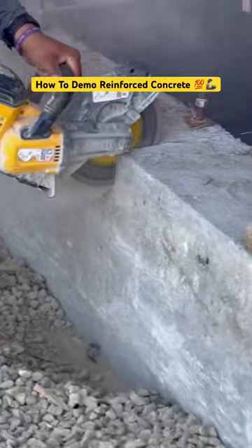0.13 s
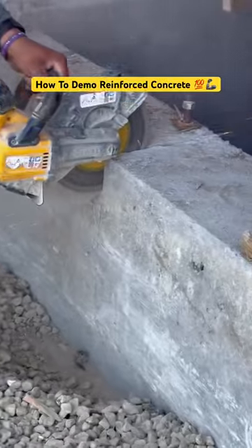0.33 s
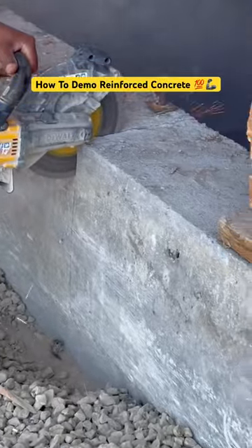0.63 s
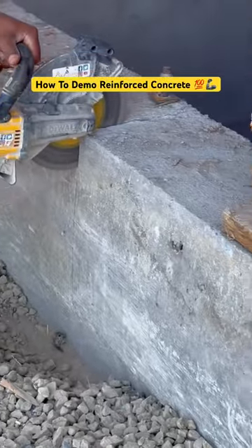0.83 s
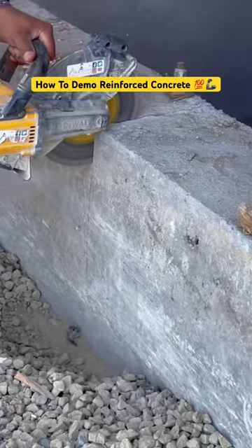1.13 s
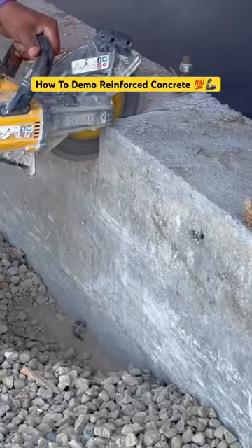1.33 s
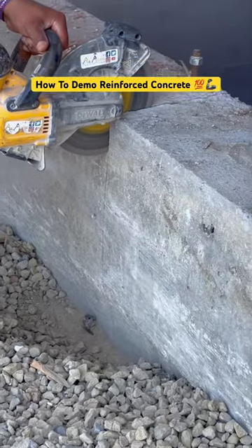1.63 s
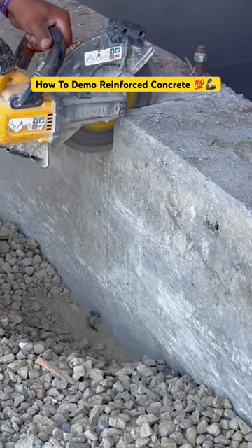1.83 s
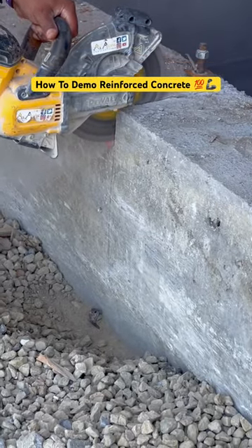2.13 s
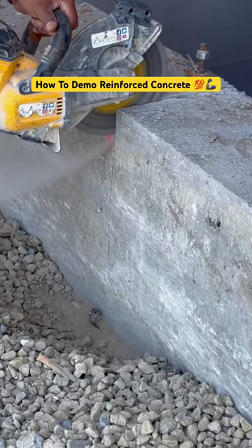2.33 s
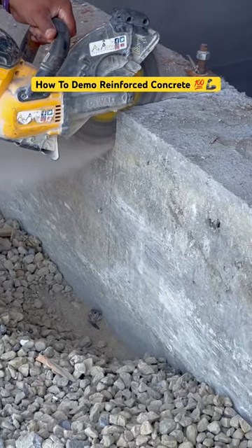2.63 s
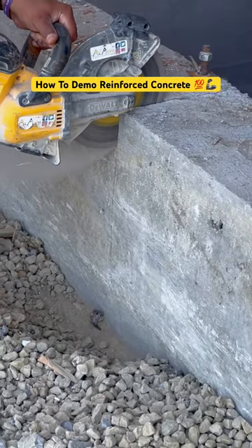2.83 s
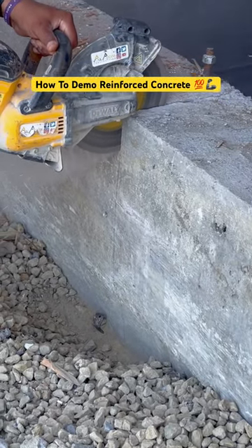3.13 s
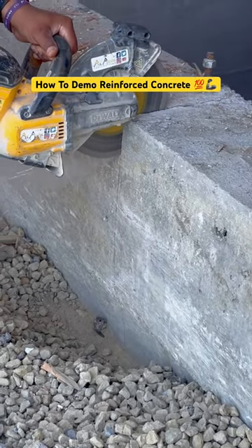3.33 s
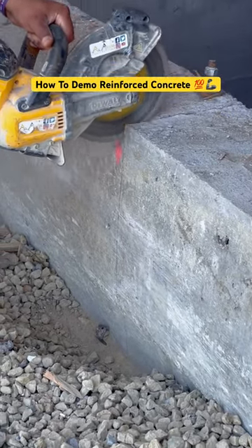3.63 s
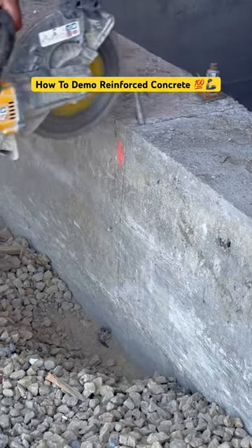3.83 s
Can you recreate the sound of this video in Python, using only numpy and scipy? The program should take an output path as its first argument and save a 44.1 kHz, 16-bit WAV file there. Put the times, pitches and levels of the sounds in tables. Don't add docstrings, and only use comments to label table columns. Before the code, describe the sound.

A handheld cut-off saw grinds loudly through concrete, then lifts out as its disc rings and motor winds down

```python
import sys
import numpy as np
from scipy import signal
from scipy.fft import rfft, irfft
from scipy.io import wavfile

SR = 44100
rng = np.random.default_rng(int(sys.argv[2]) if len(sys.argv) > 2 else 0)


def field_ratio(decibels):
    return 10 ** (np.asarray(decibels, dtype=float) / 20)


def unload_wav(signal):
    wavfile.write(
        sys.argv[1],
        SR,
        np.round(np.clip(np.atleast_2d(signal).T, -1, 1) * 32767).astype(np.int16),
    )


N = 176400
HZ = np.maximum(np.fft.rfftfreq(N, 1 / SR), 1)
TIME = np.arange(N) / SR


def in_time(rows):
    s, *columns = np.transpose(rows)
    return [np.interp(TIME, s, c) for c in columns]


def rms_one(x):
    return x / np.sqrt(np.mean(x ** 2) + 1e-20)


def gain_at(points, column=1):
    p = np.array(points)
    return field_ratio(np.interp(np.log(HZ), np.log(p[:, 0]), p[:, column]))


def shaped(x, gain):
    return irfft(rfft(x) * gain, N)


def colored_noise(gain):
    return rms_one(shaped(rng.standard_normal((2, N)), gain))


def drift(rate):
    r = np.exp(-128 * np.pi * rate / SR)
    noise = rng.standard_normal(N // 64 + 1502)
    slow = signal.lfilter([1], [1, -2 * r, r * r], noise)[1500:]
    return np.interp(np.arange(N) / 64, np.arange(len(slow)), rms_one(slow))


def resonate(x, hz, width_hz):
    r = np.exp(-np.pi * width_hz / SR)
    peak = (1 - r * r) / 2
    return signal.lfilter([peak, 0, -peak], [1, -2 * r * np.cos(2 * np.pi * hz / SR), r * r], x)


# (time [s], level [dB])
GUST = [(0.06, -51.5), (0.34, -56), (0.39, -67.5), (1.37, -82), (1.42, -78), (1.71, -65), (1.9, -71),
        (2.43, -70), (2.46, -56), (2.66, -60), (2.73, -74), (3.16, -71), (3.23, -63), (3.56, -78),
        (3.58, -66), (4.0, -61)]
# (frequency [Hz], density [dB per Hz])
WIND_TONE = [(25, -40), (55, -8), (85, -1), (120, -12), (190, -10), (280, -26), (420, -55), (900, -100)]


def wind():
    gust_db, = in_time(GUST)
    return field_ratio(gust_db - 3.0 + 1.3 * drift(4.2)) * colored_noise(gain_at(WIND_TONE))


# (time [s], level [dB])
SHUDDER = [(0.06, -55), (0.41, -56.5), (0.51, -66.5), (1.38, -68.5), (2.01, -58), (2.03, -65),
           (2.16, -55.5), (2.61, -55), (2.7, -59), (2.77, -57), (2.8, -66), (3.3, -76), (3.41, -62),
           (3.55, -82), (3.6, -59), (3.89, -69), (3.96, -62), (4.0, -67)]
# (frequency [Hz], density [dB per Hz])
SHUDDER_TONE = [(110, -28), (220, -6), (290, -2), (370, -5), (480, -2), (600, -8.5), (1200, -90)]


def shudder():
    shudder_db, = in_time(SHUDDER)
    return field_ratio(shudder_db + 1.0 * drift(8.6)) * colored_noise(gain_at(SHUDDER_TONE))


# (frequency [Hz], density [dB per Hz])
FAN_TONE = [(400, -26.5), (1400, -8), (1900, -5.5), (2800, -6.5), (6000, -13), (9000, -24), (11300, -14.5),
            (13600, -28)]


def fan():
    fan_db, top_hz = -45, 13900
    return field_ratio(fan_db + 0.93 * drift(29)) * colored_noise(gain_at(FAN_TONE) * (HZ < top_hz))


# (time [s], pitch [Hz], level [dB])
WHINE = [
    (3.66, 1160, -62),
    (3.70, 1165, -50),
    (3.79, 1170, -57),
    (3.83, 1130, -55),
    (3.88, 1055, -57),
    (3.925, 995, -44),
    (3.96, 975, -56),
    (4.0, 940, -56),
]


def motor():
    octave_db = -8
    hz, db = in_time(WHINE)
    phase = 2 * np.pi * np.cumsum(hz) / SR
    level = np.sqrt(2) * field_ratio(db + 4.3 * drift(20)) * (TIME > WHINE[0][0])
    mid = np.sin(phase) + field_ratio(octave_db) * np.sin(2 * phase)
    side = 0.66 * np.cos(phase)
    return level * np.array([mid, side])


# (frequency [Hz], level at the lift [dB], t60 [s])
FREE_RING = [(1940, -47.5, 1.5), (2210, -58, 3.0), (2720, -65, .9), (2719, -44.5, 0.65), (2830, -45.5, 1.1),
             (3020, -64, .6), (3500, -51, 1.5), (3960, -53, 1.5), (595, -62.5, 3.0), (954, -54, 0.21)]


def free_ring():
    freed_s, width_hz = 3.72, 10.4
    air = rng.standard_normal((2, N))
    since = TIME - freed_s
    swell = np.clip(1 + since / 0.14, 0, 1)
    out = 0
    for hz, db, t60 in FREE_RING:
        mode = rms_one(resonate(resonate(air, hz, width_hz), hz, 8 * width_hz))
        out = out + field_ratio(db - 60 * np.maximum(since, 0) / t60) * mode
    return swell * out


# (frequency [Hz], density [dB per Hz])
GRIT_TONE = [(330, -48), (480, -19), (620, -15), (1500, -13), (2500, -4.5), (5000, -4), (9000, -3.5),
             (15500, -6.5)]


def grit(turns):
    flutter_db, wobble = 0.39, 0.1
    flutter = field_ratio(flutter_db * (drift(17) + drift(16.0)))
    return colored_noise(gain_at(GRIT_TONE)) * flutter * (1 + wobble * np.cos(2 * np.pi * turns))


# (multiple of the speed, level [dB])
BUMPS = [(7, -4), (8, 4.5), (9, -1.5), (10, 3.5), (12, 1), (13, -3), (14, 0.5), (16, 4), (17, -6),
         (18, -11), (19, -4.5), (25, 3.5), (26, 2.5), (29, 9.5), (35, 4.5), (38, 0.5), (46, 5), (59, 3)]
# (time [s], length [s], multiple of the speed,
# level [dB])
SQUEALS = [(0.11, 0.12, 17, 20), (0.6, 0.29, 26, 6), (0.8, 0.41, 17, 18.5), (0.536, 0.3, 65, 13),
           (1.21, 0.36, 29, 3), (1.045, 0.093, 25, 7.5), (1.04, 0.039, 64, 18), (1.211, 0.13, 34, 15),
           (1.24, .38, 14, 13), (1.64, 0.35, 16, 7), (1.66, 1, 10, 5.5), (1.773, 0.36, 32, 25.5),
           (2.5, .08, 48, 22), (2.6, 0.2, 7, 13.5), (2.89, 0.15, 16, 10), (3.0, 0.14, 15, 10),
           (3.02, 0.066, 28, 21.5), (3.4, 0.084, 12, 14.5), (2.8, 0.16, 32, 14), (3.0, 0.12, 33, 11),
           (0.96, 0.16, 6, 19.5), (1.8, 1, 8, 5.5), (0.16, 0.18, 11, 9), (0.093, 0.16, 10, 0),
           (2.76, 0.38, 11, 8.5), (2.3, .5, 3, 18), (2.3, 0.34, 4, 32.5), (1.89, .15, 6, 22),
           (2.9, 0.23, 6, 16.5), (1.9, 0.13, 13, 24), (2.35, 0.18, 16, 18.5), (2.2, 0.16, 17, 23),
           (2.5, .7, 19, 12), (2.34, 0.44, 20, 9.5), (2.73, .4, 14, 6.5), (3, 0.21, 10, -1.5),
           (3.26, 0.55, 8, -15), (0.78, 0.3, 13, 11.5), (3.12, 0.21, 14, 9), (2.92, 0.16, 10, 3),
           (2.55, .2, 9, 2.5), (3.35, 0.16, 18, 18)]
# (frequency [Hz], gain [dB])
RIM_TONE = [(200, -36), (430, -23.5), (600, -7), (1300, -6), (2500, -3), (4000, 1.5), (5200, -1.5),
            (6000, -35)]


def squeal(multiple):
    db = 0
    for s, length_s, order, peak_db in SQUEALS:
        if round(order) == multiple:
            db = db + peak_db * np.exp(-(2 * (TIME - s) / length_s) ** 4)
    return field_ratio(db)


def rim(turns):
    wander_db = 1.8
    bumps = {round(k): db for k, db in BUMPS}
    step = np.exp(2j * np.pi * turns)
    spin = step ** 2
    out = np.zeros((2, N))
    for k in range(3, 72):
        spin = spin * step
        start = np.exp(2j * np.pi * rng.random(2))
        sings = squeal(k)
        level = field_ratio(bumps.get(k, 0) + wander_db * drift(4.5))
        out[0] += sings * level * (start[0] * spin).real
        out[1] += sings * np.roll(level, N // 2) * (start[1] * spin).real
    return rms_one(shaped(out, gain_at(RIM_TONE)))


LOW_HZ = [609, 760, 890, 1215, 1300, 1582, 1754, 1935, 2210, 2620, 2880]
HIGH_HZ = [3250, 3490, 3800, 4255, 4590, 4895, 5000, 5330, 5900, 6300, 6700, 6910, 7050, 7200]
GUARD_HZ = [7650, 8150, 8310, 8535, 9330, 10450, 10650, 11330, 11800, 12000, 12250, 13150, 14230, 15120]
# (width [Hz], level [dB])
LOW_SHAPE = [(57, 14.5), (76, 10.5), (120, 6), (121, 11.5), (31, -4), (62.7, 9.5), (73, 13.5), (60.6, 15),
             (19.1, 6), (60, 13.5), (35.3, 14)]
HIGH_SHAPE = [(25, 2.1), (132, 7.4), (201, 3.8), (34.4, 6.2), (88.5, 6.1), (59.5, 11.3), (80, 11.9),
              (44.5, 14), (79, 4.7), (250, 10), (80, 13.3), (40, 9.4), (50, 10.5), (60, 8.4)]
GUARD_SHAPE = [(250, 9.8), (200, 8.2), (50, 4), (80.5, 12.6), (120, 9.9), (70, 10.3), (89, 3.6), (70, 6.9),
               (150, 11.9), (90, 8.4), (90, 13), (150, 12.7), (200, 14), (220, 12.3)]


def disc(force):
    direct_db, wander_db = 2, 2.5
    steady_below_hz, steady_share = 1400, 0.3
    modes = zip(LOW_HZ + HIGH_HZ + GUARD_HZ, LOW_SHAPE + HIGH_SHAPE + GUARD_SHAPE)
    out = field_ratio(direct_db) * force
    for hz, (width_hz, db) in modes:
        share = steady_share if hz < steady_below_hz else 1
        level = field_ratio(db - 3 + share * wander_db * drift(3.0))
        out += level * resonate(force, hz, width_hz)
    return out


def crowd(force):
    width_hz, level_db, wander_db = 22, 0, 7.0
    spectrum = rfft(force)
    places = np.linspace(2800, 15700, 120) + rng.uniform(-50, 50, 120)
    groups = rng.permuted(places.reshape(20, 6), axis=1).T
    signs = np.resize([1, -1], (20, 1))
    out = 0
    for group_hz in groups[:, :, None]:
        response = (signs / (1 + 2j * (HZ - group_hz) / width_hz)).sum(axis=0)
        out = out + field_ratio(level_db + wander_db * drift(6.7)) * irfft(spectrum * response, N)
    return out


HOLLOW_HZ = [2420, 2760, 3360, 5500, 6150, 8820, 9900, 10950, 12700, 13700, 14750]


def hollowed(x):
    width_hz, depth, swing = 200, 0.35, 0.6
    for hz in HOLLOW_HZ:
        x = x - np.clip(depth + swing * drift(5.2), 0, 1) * resonate(x, hz, width_hz)
    return x


# (time [s], speed [turns per s])
SPIN = [(.06, 76.7), (.3, 76.1), (.56, 74.9), (.85, 75.0), (1.05, 76.7), (1.22, 77.75), (1.4, 77.3),
        (1.64, 75.9), (1.8, 75.7), (1.94, 79), (2.12, 87), (2.35, 90), (2.5, 88), (2.72, 83.2), (2.9, 81),
        (3.14, 77.5), (3.4, 72.6), (3.5, 70.8)]
# (time [s], rim level re grit [dB])
SEATING = [
    (.06, -8),
    (1.86, -8),
    (1.93, -20),
    (2.1, -17),
    (2.42, -14),
    (2.55, -11),
    (3.0, -10),
    (3.42, -11),
    (3.5, -28),
]
# (time [s], level [dB])
BITE = [(0.06, -25.5), (0.12, -26.5), (0.59, -26.5), (0.68, -27), (1.03, -27), (1.07, -28.5), (1.97, -29),
        (2.05, -29), (2.13, -30.5), (2.17, -26), (2.36, -29), (2.41, -25), (3.46, -27), (3.51, -28.5),
        (3.59, -28), (3.65, -34.5), (3.71, -29.5), (3.8, -55)]


def cut():
    lift_db_per_s = -600
    (speed,), (rim_db,), (bite_db,) = in_time(SPIN), in_time(SEATING), in_time(BITE)
    turns = np.cumsum(speed) / SR
    bite_db = bite_db + lift_db_per_s * np.maximum(TIME - BITE[-1][0], 0)
    force = field_ratio(bite_db + 0.5) * (grit(turns) + field_ratio(rim_db) * rim(turns))
    sound = hollowed(disc(force) + crowd(force))
    return rms_one(sound) * np.std(force)


# (frequency [Hz], settled [dB], at the start [dB])
WIDTH = [(60, -5, -15), (400, -1, -12), (1720, 1.5, -7.5), (2200, -6, -59), (2800, 1, -13), (3520, -3, -8),
         (4870, -9.5, -30), (5010, 0, -1)]


def scene():
    widen_s = 0.91
    mid, side = wind() + shudder() + fan() + motor() + free_ring() + cut()
    narrow = np.exp(-(TIME / widen_s) ** 2)
    at_start = shaped(side, gain_at(WIDTH, column=2))
    settled = shaped(side, gain_at(WIDTH))
    side = narrow * at_start + (1 - narrow) * settled
    return np.array([mid + side, mid - side])


def band_limit(x):
    return signal.sosfilt(signal.butter(12, 16840, fs=SR, output="sos"), x)


def record(dry):
    start_s, fade_s, cutoff_hz = 0.05, 0.0041, 15720
    settle_db, settle_s = 4, 0.2
    gate = 1 / (1 + np.exp(np.clip((start_s - TIME) / fade_s * 2, -50, 50)))
    gain = field_ratio(settle_db * np.exp(-TIME / settle_s))
    mix = shaped(dry * (gate * gain), HZ < cutoff_hz)
    return band_limit(mix)


dry = scene()
out = record(dry)
unload_wav(out)
```